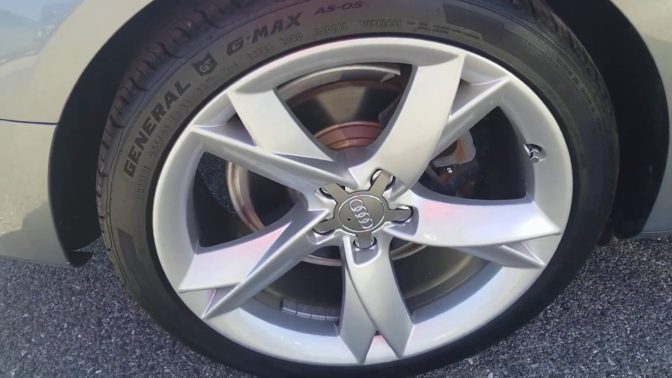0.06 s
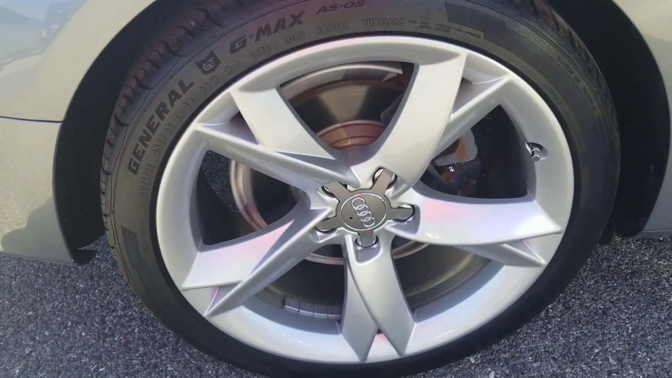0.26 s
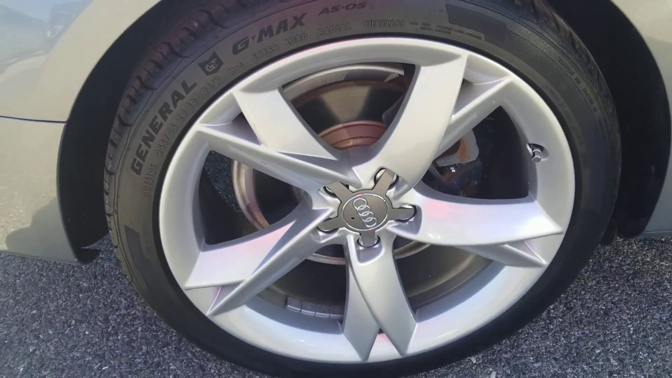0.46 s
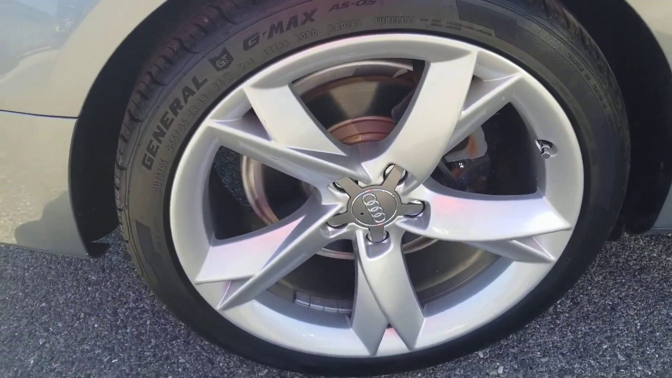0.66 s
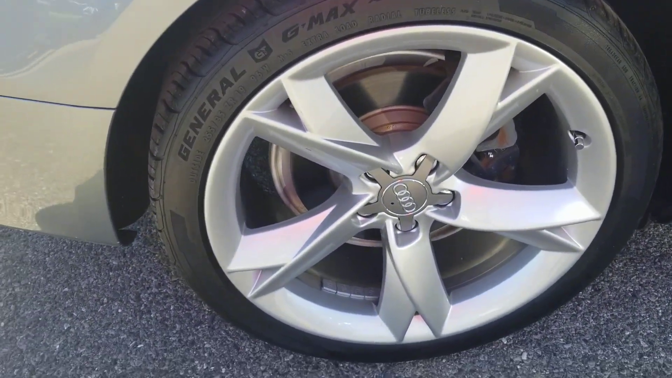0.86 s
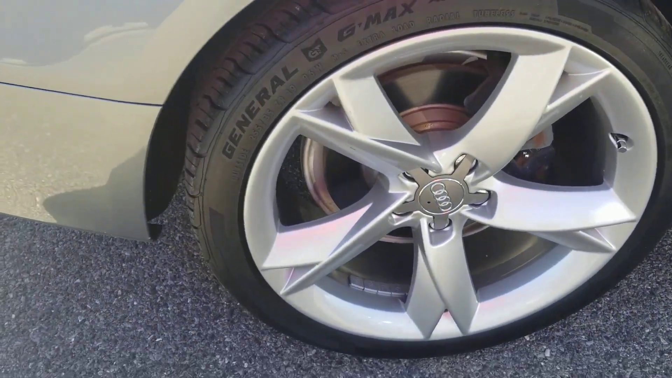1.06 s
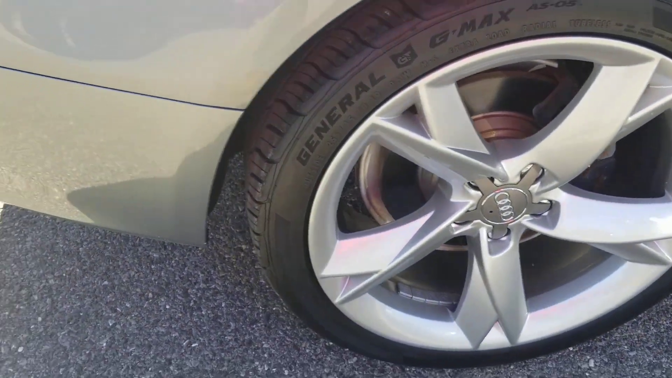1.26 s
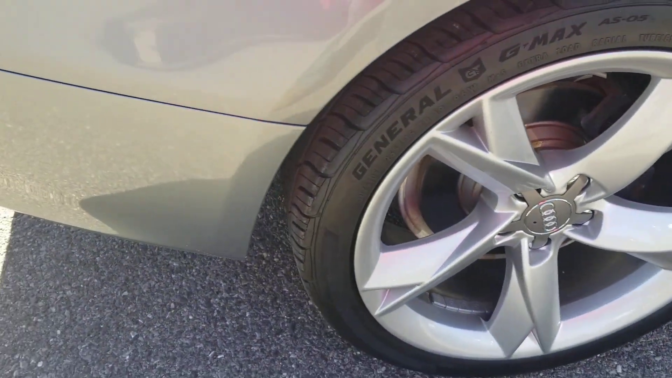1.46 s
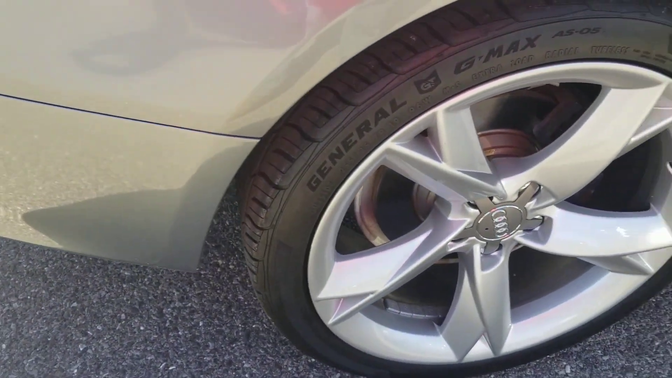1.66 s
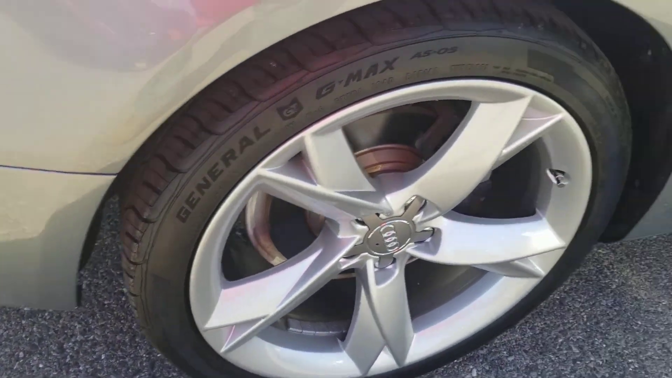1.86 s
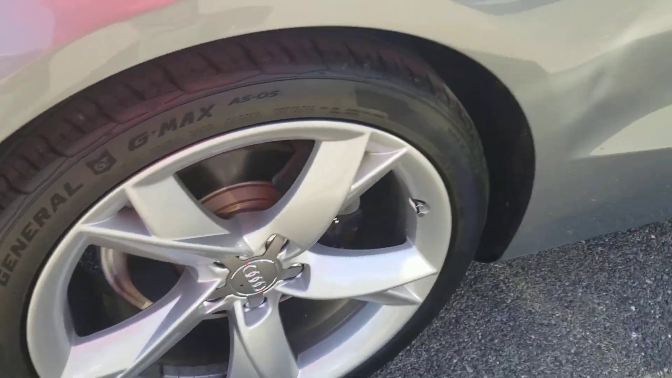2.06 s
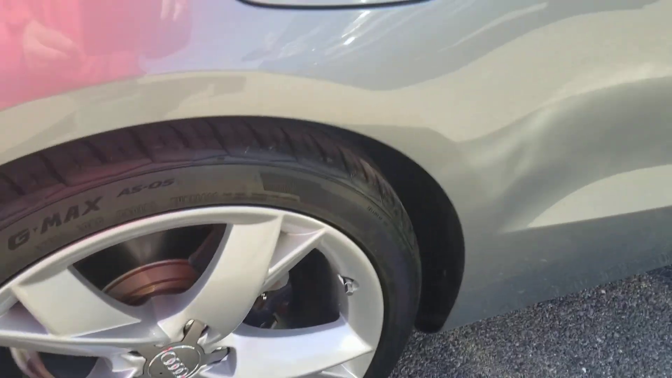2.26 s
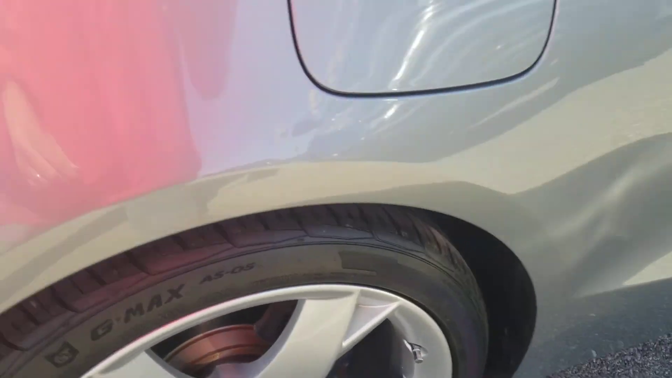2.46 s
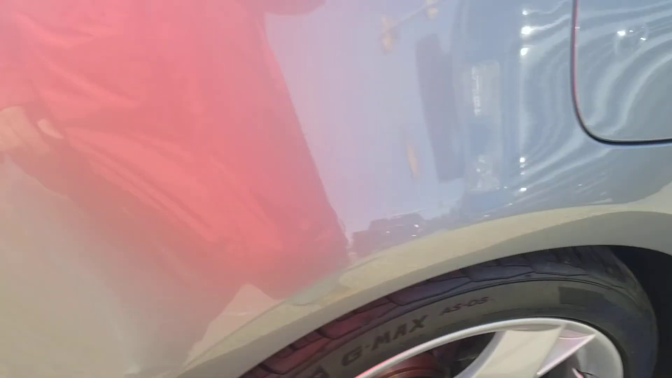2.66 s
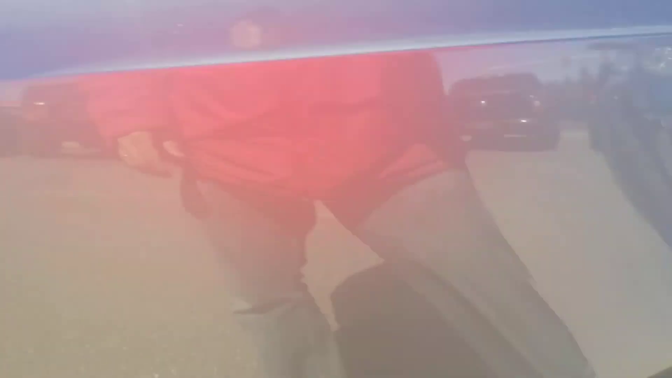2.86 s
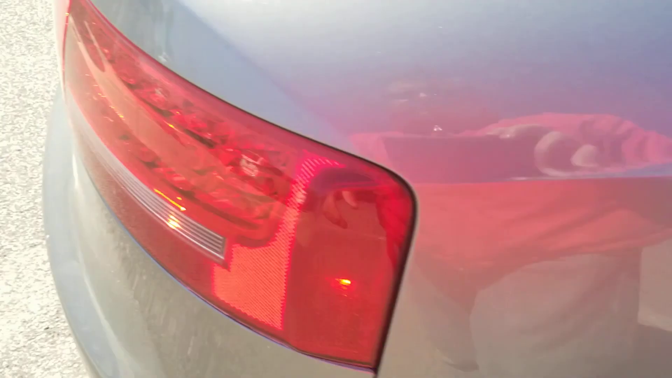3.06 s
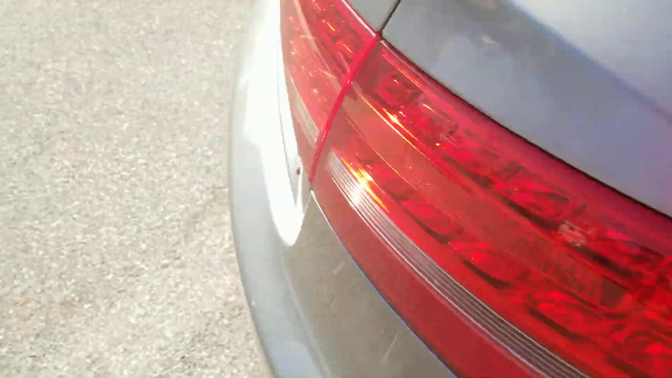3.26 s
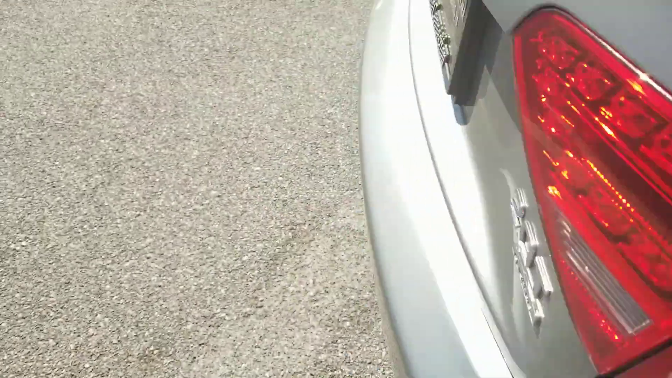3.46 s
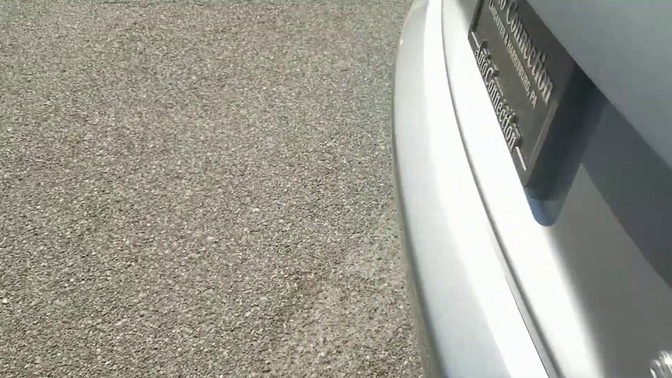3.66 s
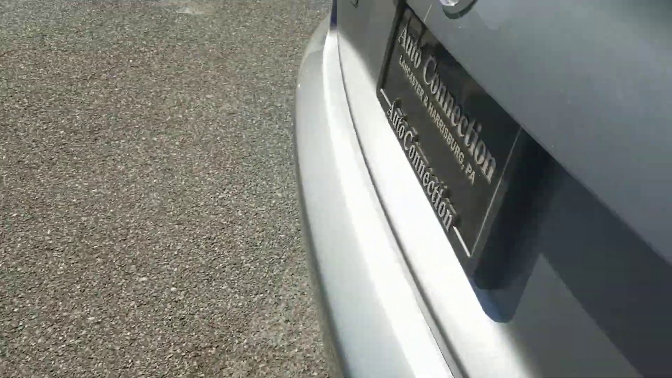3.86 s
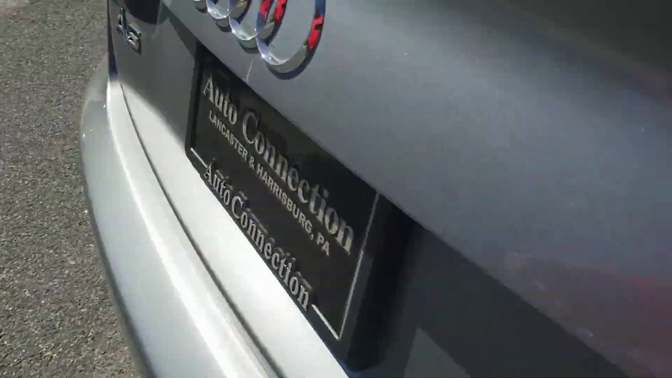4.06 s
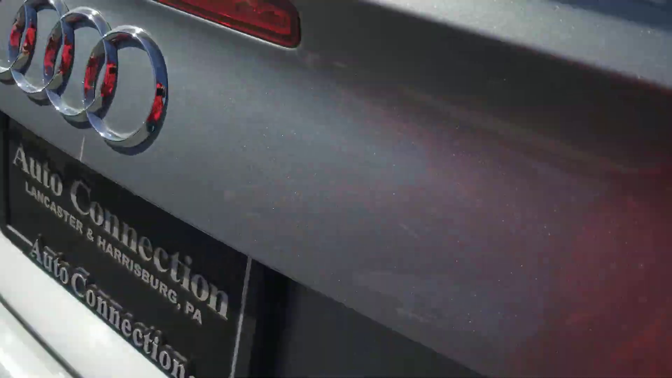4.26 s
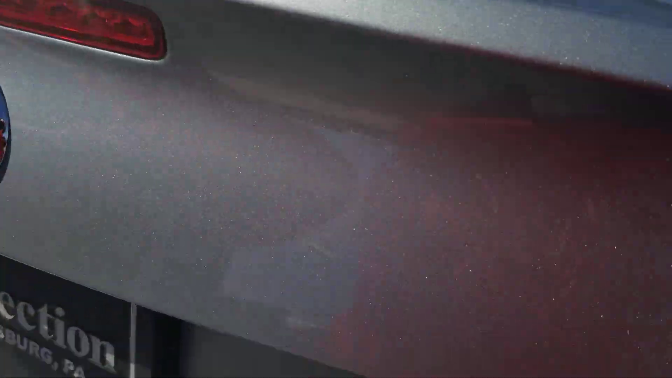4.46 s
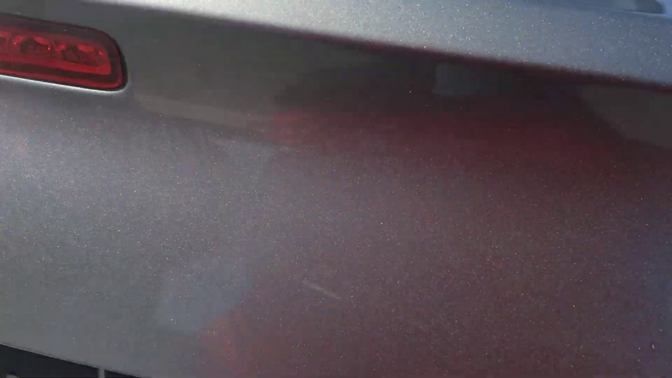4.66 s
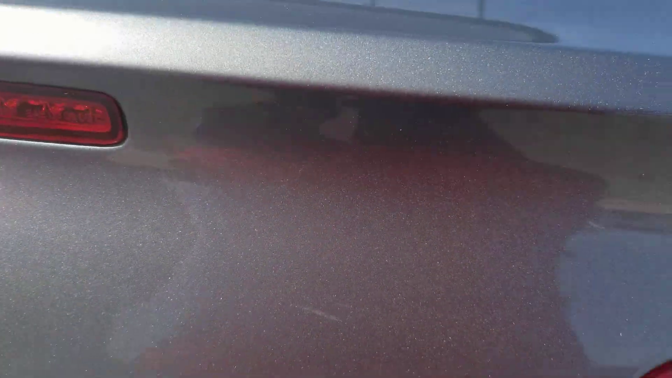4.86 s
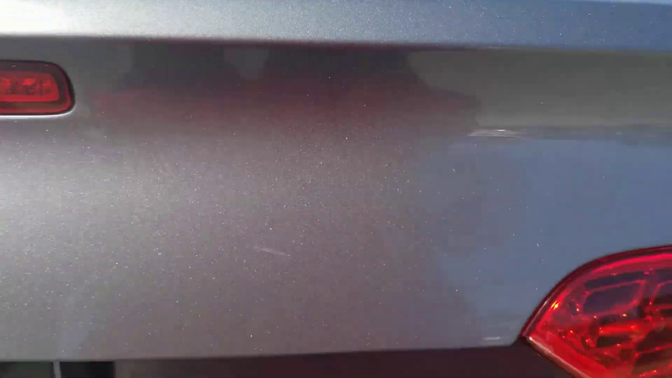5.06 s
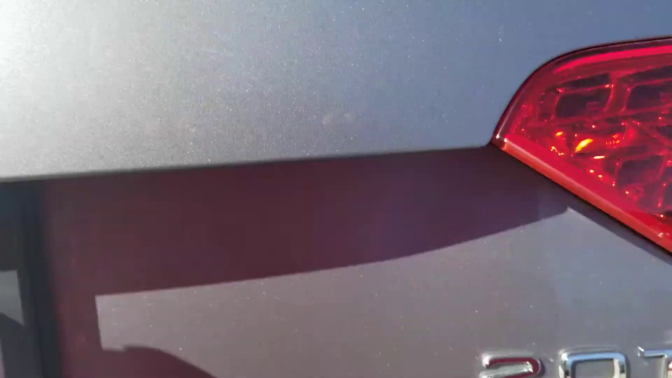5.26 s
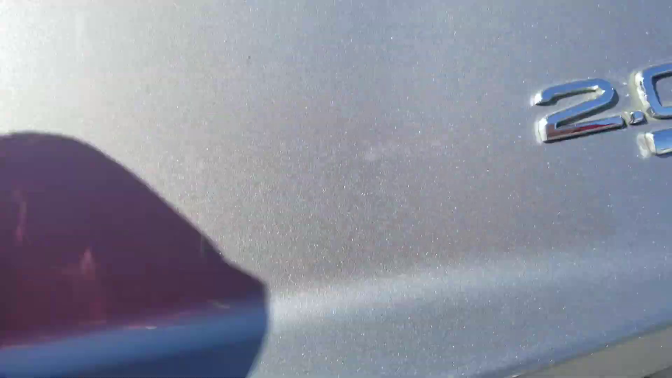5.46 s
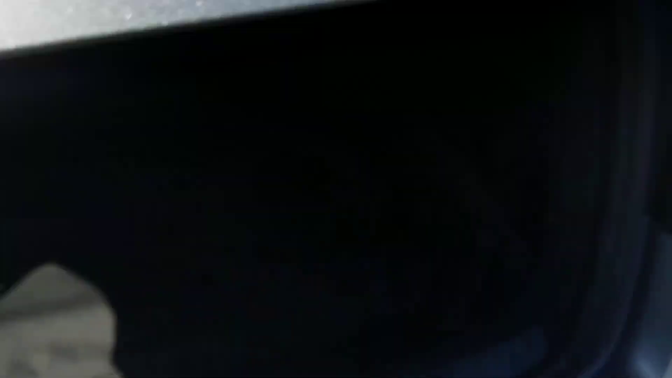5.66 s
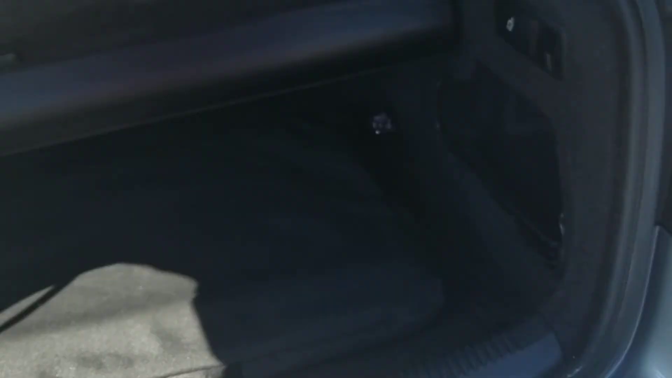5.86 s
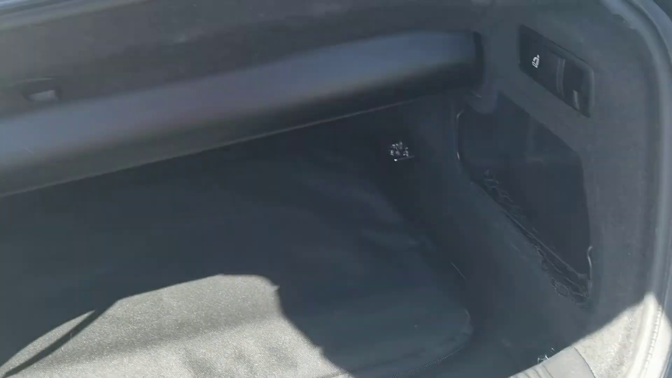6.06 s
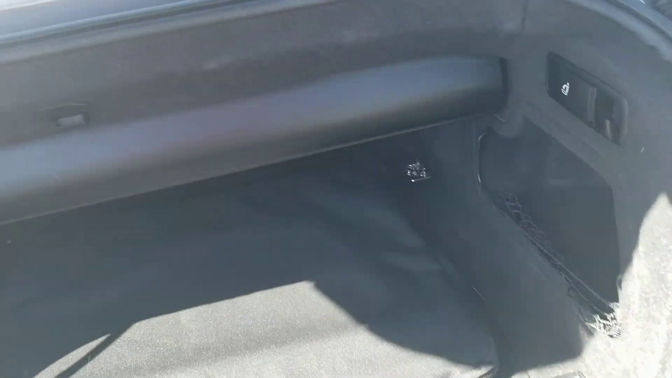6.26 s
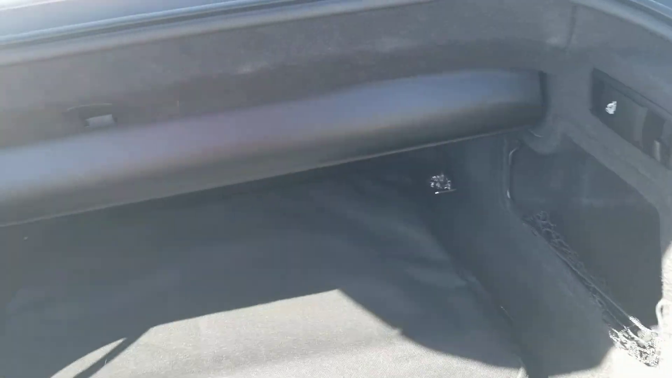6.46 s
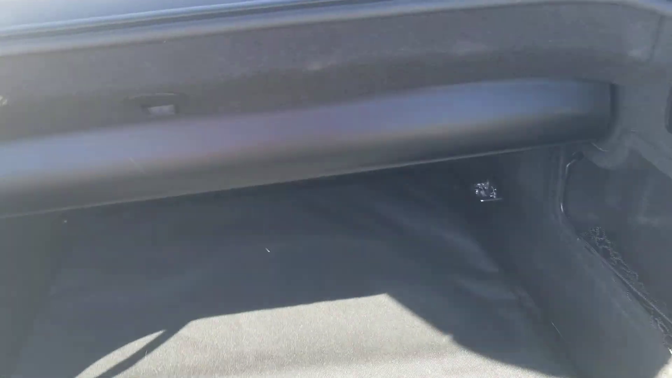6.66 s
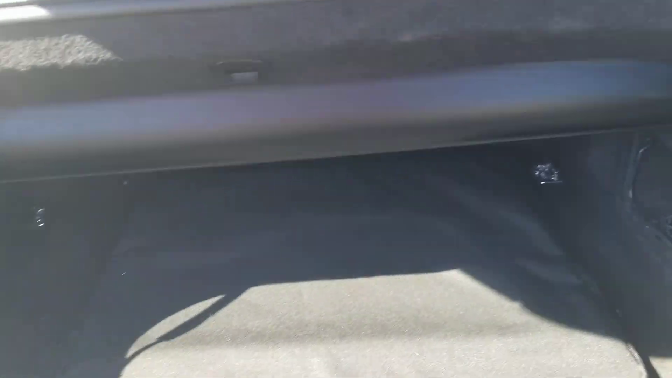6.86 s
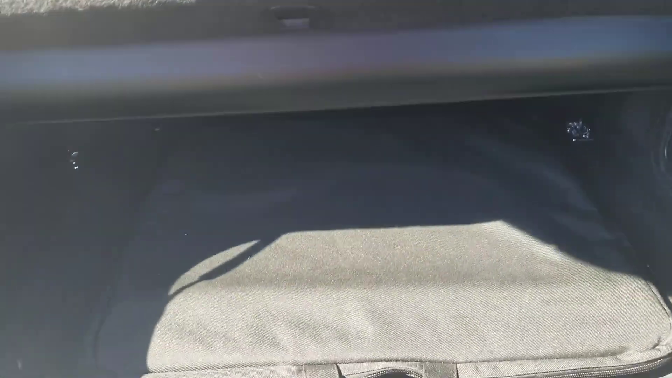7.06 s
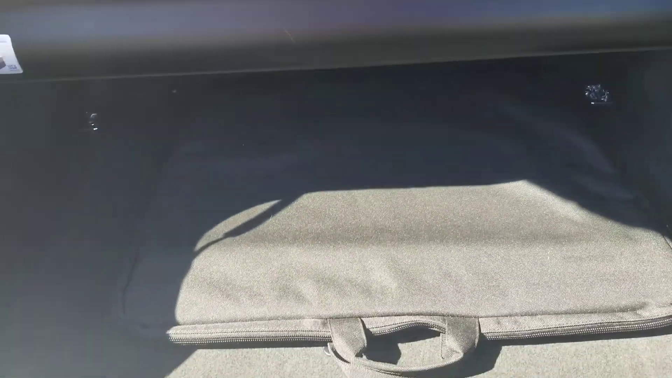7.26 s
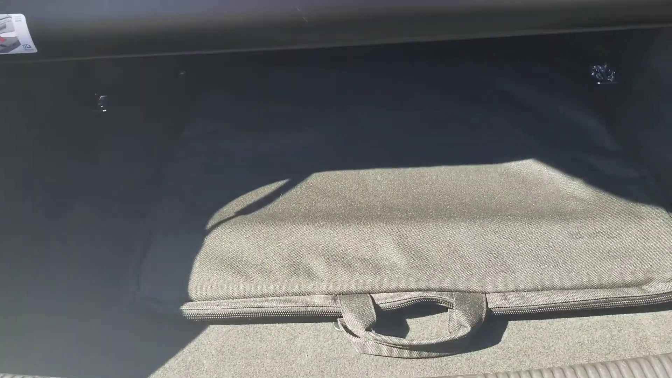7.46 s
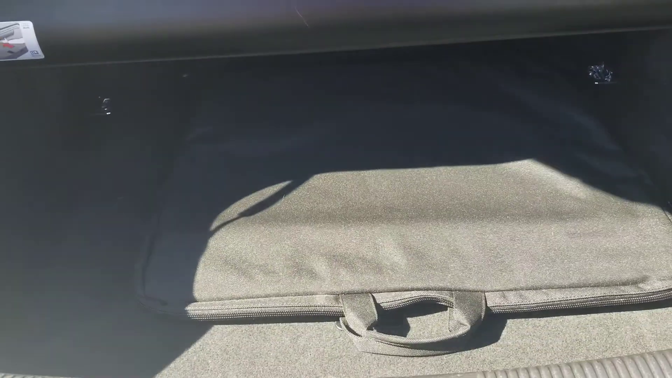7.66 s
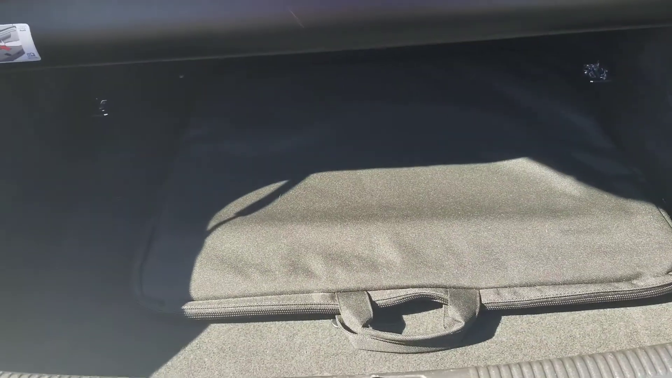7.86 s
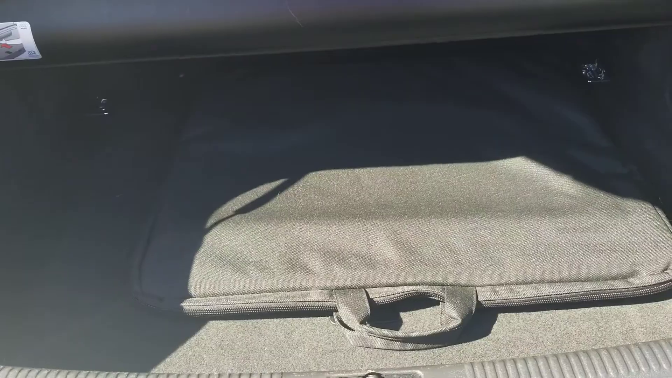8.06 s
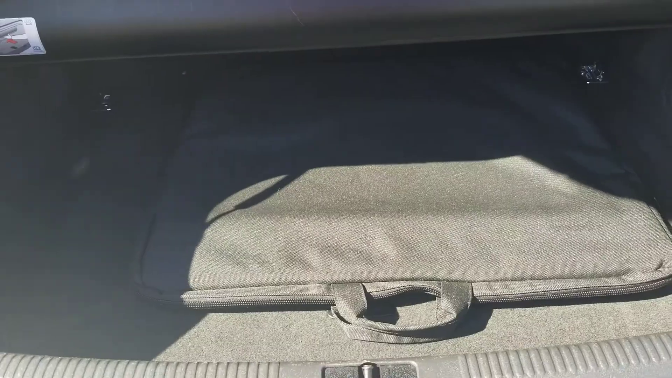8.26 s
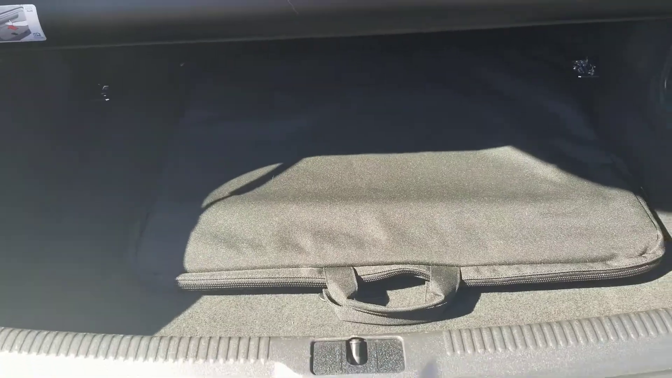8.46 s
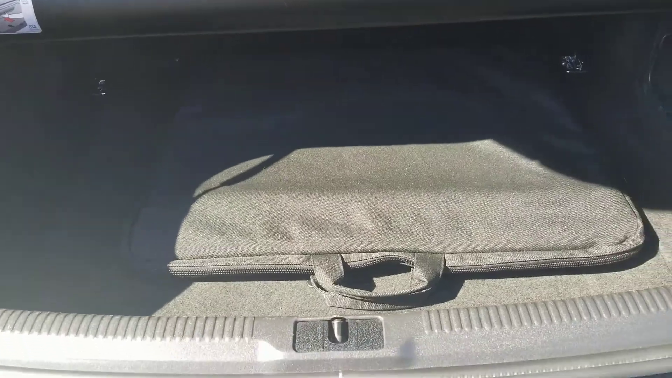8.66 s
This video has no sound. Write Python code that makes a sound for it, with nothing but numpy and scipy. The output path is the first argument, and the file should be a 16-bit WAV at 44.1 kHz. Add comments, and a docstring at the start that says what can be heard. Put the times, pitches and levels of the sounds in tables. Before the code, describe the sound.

A car trunk latch whirs and clacks open sharply, then clicks again, over low traffic rumble and an idling engine on an open lot.

```python
"""Traffic rumble, the drones of passing engines and tyre roar lie to the right, under a car idling on an open lot.
The microphone is carried from the rear wheel to the trunk: exhaust orders, chuff and hiss follow level curves.
The latch motor whirs, the pawl snaps free, the lid pops off its rubber seal and rises; small trim ticks follow.
Noise beds are filtered, engines are sines, and latch and trim are rattling contacts that ring damped modes."""
import sys
import numpy as np
from scipy import signal
from scipy.fft import rfft, irfft, next_fast_len
from scipy.io import wavfile

SR = 44100
rng = np.random.default_rng(int(sys.argv[2]) if len(sys.argv) > 2 else 0)


def volts_from_db(level):
    """Convert decibel levels to linear amplitude ratios."""
    exponent = np.asarray(level, float) / 20
    return 10 ** exponent


def transcribe(u):
    """Save the signal u as a 16-bit wav file named by the first command-line argument.

    u: samples, shape (n,) or (channels, n), limited to [-1, 1]; the rate is SR.
    q: integer samples, one column per channel.
    """
    v = np.clip(np.atleast_2d(u).T, -1, 1)
    q = np.round(v * 32767).astype(np.int16)
    wavfile.write(sys.argv[1], SR, q)


N = 384664   # samples, 8.72 s
HZ = np.fft.rfftfreq(next_fast_len(N), 1 / SR) + 1e-3   # just above zero, so its logarithm exists

# Left-right likeness of far noise: hz, likeness (0 to 1)
LIKENESS = [(30, 0.74), (100, 0.78), (300, 0.99), (1000, 0.63), (3000, 0.11), (7000, 0.019), (15000, .02)]
# Levels around the turning microphone: time_s, chuff_db, tyre_roar_db, engine_bay_hiss_db, high_hiss_db
AROUND_LEVELS = [(0.0, -50.5, -52, -59, -60), (0.87, -49.5, -51, -59.5, -60), (1.8, -54, -51, -60.5, -61.5),
                 (2.31, -50.5, -49.5, -57.5, -59), (2.62, -49.5, -50.5, -60.5, -59),
                 (3.1, -48.5, -53.5, -66, -64.5), (3.42, -47.5, -51.5, -65, -62),
                 (3.7, -48, -55.5, -66.5, -66.5), (4.25, -49, -50.5, -62.5, -60),
                 (4.69, -46, -52, -61.5, -60), (4.9, -45.5, -53.5, -67, -64),
                 (5.39, -51, -55.5, -68, -65.5), (5.8, -51.5, -56, -65.5, -59.5),
                 (6.29, -51, -50.5, -64.5, -62), (6.7, -52.5, -52, -67.5, -65),
                 (7.3, -52.5, -52.5, -66, -68), (8.09, -51, -52.5, -66.5, -69),
                 (8.72, -49.5, -50.5, -65.5, -66)]
# Traffic rumble swelling and sinking: time_s, level_db
RUMBLE_LEVEL = [(0.0, -38), (.31, -34), (.44, -40), (1.4, -33.5), (1.63, -32), (1.73, -46), (1.87, -29.5),
                (2.08, -35.5), (2.2, -31.5), (3.42, -31), (3.62, -41), (3.9, -33.5), (4.25, -38),
                (4.7, -34), (5.8, -35.5), (5.94, -36), (6.04, -45), (6.17, -29.5), (6.22, -36),
                (6.35, -39.5), (6.7, -41.5), (7.0, -38.5), (7.3, -35.5), (8.1, -37.5), (8.72, -36)]
# Noise colours, only their shape counts: hz, density_db (per Hz)
RUMBLE_COLOUR = [(12, -34), (20, -14.5), (91, -3), (400, -28), (520, -47), (880, -120)]
TYRE_ROAR_COLOUR = [(530, -5.5), (900, 0), (1260, -2.5), (1480, 0.5), (2230, -6.5), (3400, -21),
                    (4420, -25.5), (7480, -120)]
SWISH_COLOUR = [(1000, -28), (1400, -3.5), (1900, 1), (2400, -2.5), (3000, -11), (4000, -20.5)]
ENGINE_BAY_COLOUR = [(1710, -20), (2900, 3.5), (3960, 1), (4460, 4), (5620, 3), (6520, -0.5), (7600, -14),
                     (9880, -56), (16700, -120)]
HIGH_HISS_COLOUR = [(4000, -67), (6800, -6), (8020, -4), (12500, 2.5), (15200, -3.5), (15750, 3)]
CHUFF_COLOUR = [(150, -68), (260, -9.5), (340, -15), (420, -15), (900, -19), (1050, -20.5), (1360, -23),
                (2310, -120)]
TAILPIPE_COLOUR = [(370, -28), (448, -10.5), (485, -9.5), (503, -1.5), (523, -12), (560, -10.5), (682, -9),
                   (770, -14), (900, -40)]
RUB_COLOUR = [(180, -41), (300, -8), (600, -1), (959, 0), (1370, -2.5), (1650, -4), (2000, 1.5), (2760, -4),
              (3600, -5.5), (4700, -14), (6100, -29), (7540, -51), (15000, -34)]
# Tyre swish of cars going by: nearest_s, peak_db, approach_db_per_s, retreat_db_per_s
PASSING_CARS = [(4.55, -54.5, 5, 18), (6.4, -51, 12, 10)]
# Exhaust notes of passing engines, one table each: time_s, pitch_hz, level_db
DRONES = [
    [(0.0, 91.6, -34), (.3, 88.8, -38.5), (.45, 87.2, -46), (.55, 85.7, -31), (1.15, 80.8, -32),
     (1.4, 78, -34), (1.7, 75.5, -39)],
    [(1.8, 72, -30), (2.05, 66.1, -43), (2.2, 63.6, -28), (2.6, 60.5, -44), (2.85, 59.74, -28.5),
     (3.1, 59.2, -28.5), (3.7, 55.56, -39)],
    [(1.8, 103, -46), (1.9, 99.8, -43), (2.08, 96.6, -57), (2.5, 93.7, -37), (3.35, 89.24, -33),
     (3.6, 87.5, -61)],
]
# Short low booms from the road: peak_s, length_s, pitch_hz, level_db
BOOMS = [(.1, 0.36, 66, -34.5), (0.734, 0.63, 65, -28.5), (1.318, 0.27, 66, -25.5),
         (2.518, 0.27, 72, -26.5), (7.419, 0.47, 74.5, -31.5)]
# Low pressure bumps: gusts and grip at the microphone, and the lid's thump near 4.97 s:
# time_s, peak_db, length_s, left_over_right_db
BUMPS = [(4.422, -20, 0.019, 1), (4.972, -23, 0.017, 0), (5.789, -24, 0.016, -7), (5.979, -26.5, 0.0084, 3),
         (6.174, -23, 0.0061, 1), (6.544, -26.5, 0.0058, -7), (6.61, -27, .01, 14)]
# The exhaust comes nearer, then the trunk screens it: time_s, first_order_db, orders_2_to_4_db, upper_orders_db
IDLE_LEVELS = [(0, -38, -30, -35.5), (.6, -38, -49, -37.5), (1.6, -38, -56, -39), (2.4, -49, -57, -44),
               (3.1, -34, -44, -39), (3.7, -30.5, -36, -35), (4.6, -38, -32, -36.5), (5.0, -42, -39.5, -37),
               (5.5, -34, -38, -40), (6.1, -42, -51, -47), (6.9, -42, -42, -47), (7.7, -35, -43.5, -43),
               (8.72, -36, -41.5, -40.5)]
# Balance of the exhaust orders, added to the levels above: multiple of the firing rate, level_db
IDLE_ORDERS = [(1, -7), (2, 1.5), (3, -2.5), (4, -11.5), (5, -6.5), (6, -13.5), (7, -11), (8, -19.5),
               (9, -13.5), (11, -20.5), (12, -30.5), (13, -23.5)]
# The tailpipe's roar swells as the bumper comes near: time_s, level_db
TAILPIPE_LEVEL = [(0.0, -55), (0.31, -54), (0.8, -52), (1.02, -55.5), (1.92, -54.5), (2.6, -55.5),
                  (2.85, -49), (3.5, -49.5), (3.96, -48), (4.6, -49), (5.1, -51), (5.41, -52.5),
                  (6.41, -51), (6.85, -54.5), (7.29, -49.5), (8.06, -53), (8.72, -54.5)]
# Small metal parts of latch and hinge tink very high: time_s, peak_db, pitch_hz, t60_s
TINKS = [(4.8125, -20.5, 8540, .02), (4.967, -43, 6200, .015), (4.972, -30, 12280, 0.013),
         (5.1643, -26, 13840, .015), (5.1645, -34, 14800, .015), (5.165, -33.5, 5200, 0.0096),
         (5.165, -42, 7030, .006), (5.18, -38, 13400, .015), (6.4917, -44, 11300, .012)]
# Dull ticks of trim and handling: time_s, mode_peak_db, pitch_hz, left_over_right_db, crack_db, rattle_s
TICKS = [(0.2783, -44, 2500, -2.0, -50, 0.0022), (2.3411, -40, 1720, -2.5, -46, 0.003),
         (6.0752, -32, 1530, 0, -57, 0.0019), (6.1771, -33, 1630, -2, -55, 0.0034),
         (6.275, -43, 2340, -9, -44, 0.0033), (6.492, -29.5, 1230, 7, -44, 0.0029),
         (6.496, -28, 1470, 1, -46, 0.0049), (7.5386, -42, 1220, -2.0, -59, 0.0022),
         (7.775, -40.5, 1710, -6, -66, 0.0022), (7.845, -32, 1640, -7, -55, 0.0017),
         (7.972, -40, 1630, -5, -55, 0.0023), (8.2444, -39, 1230, -2, -60, .004),
         (8.2814, -41, 1280, -5, -63, 0.0035), (8.3137, -37, 1140, -7, -53, .003)]
# Modes of one tick: multiple of the tick's pitch, share
TICK_MODES = [(.82, 0.15), (1, 1), (1.33, 0.5)]
# Latch motor, pawl scraping free, seal letting go, a scuff; the last row starts after the end and stays silent:
# start_s, loudest_s, stop_s, loudest_db, lowpass_at_loudest_hz
RUBS = [(4.743, 4.768, 4.803, -27.5, 11000), (4.803, 4.818, 4.835, -35, 3700),
        (5.152, 5.168, 5.258, -36.5, 4300), (2.14, 2.18, 2.215, -46.5, 11000), (9.4, 8.25, 9.9, -59, 3000)]
# Damped modes of the lid body: pitch_hz, level_db, t60_s
LID_MODES = [(217, -10, .05), (310, -23, 0.042), (483, 1, 0.049), (702, -2, 0.062), (866, 3, 0.019),
             (1050, -1.5, 0.028), (1150, -3.5, 0.027), (1390, 1, 0.044), (1900, 3, 0.021),
             (2057, -3.5, 0.047), (2230, -1, 0.018), (2710, -7, 0.042), (3504, 1, 0.028),
             (5400, -21, 0.026), (5920, -10, 0.026)]
# Blows in latch and lid: time_s, mode_peak_db, crack_db, sizzle_db, rattle_s, favoured_hz
BLOWS = [(4.7558, -28, -58, -62, .003, 1900), (4.7613, -29, -42, -60, .003, 1200),
         (4.7665, -23, -46, -60, 0.0035, 2700), (4.777, -24, -48, -58, 0.0028, 1950),
         (4.785, -19, -28, -35, 0.0044, 1000), (4.798, -21, -50, -55, .003, 2100),
         (4.804, -11.5, -27, -27, 0.0053, 480), (4.807, -19, -20, -23, .003, 1400),
         (4.8091, -8, -18, -14, 0.0022, 850), (4.8115, -16, -20.5, -16, 0.0028, 500),
         (4.8152, -10, -25, -18, 0.0022, 1900), (4.8172, -10.5, -22, -23, 0.0025, 2050),
         (4.8224, -24, -36, -38, 0.0033, 1300), (4.839, -31, -55, -55, 0.0027, 900),
         (4.8713, -32, -50, -41, .004, 1500), (4.9647, -31, -33.5, -34, 0.0067, 2400),
         (4.9683, -32, -38, -46, .004, 1990), (4.973, -24.5, -45, -44, .005, 1340),
         (4.982, -37, -56, -55, .004, 1400), (4.9865, -38, -61, -60, .004, 1200),
         (5.043, -42, -49, -62, .003, 2700), (5.149, -32, -60, -60, .004, 1150),
         (5.16, -36, -58, -60, .003, 2700), (5.1643, -21, -30, -29, .002, 1150),
         (5.168, -32, -40, -40, .003, 1100), (5.1735, -27, -45, -44, 0.0033, 1300),
         (5.179, -28, -45, -40, .002, 1100), (5.188, -28, -50, -43, .002, 2600),
         (5.2, -31, -44, -39, .003, 1500), (5.201, -26, -52, -50, .002, 2300),
         (5.209, -32, -52, -50, .002, 2000), (5.225, -31, -58, -60, .002, 1300),
         (5.237, -34, -56, -60, 0.0018, 2600), (5.244, -29, -58, -60, .002, 2000),
         (5.2545, -35, -56, -60, 0.0016, 1900), (5.2703, -35, -61, -65, .003, 1800),
         (5.285, -45, -64, -65, .003, 1900)]
# Filters for the dry crack and high sizzle of a blow: hz, gain_db
CRACK_FILTER = [(2000, -15), (3000, 9.5), (4500, -0.5), (6000, 10.5), (7400, -8.5), (8500, -4),
                (10000, -30), (12000, -30)]
SIZZLE_FILTER = [(7000, -3), (9500, -2), (11000, -0.5), (13000, -5), (15000, -1), (16500, -29)]

# Left ear later by, in seconds; negative means earlier
ROAD_SIDE_LAG_S, TINK_LAG_S = 0.00036, -0.00037
LID_PANEL_LAG_S, LATCH_END_LAG_S = -0.00015, -0.00042
EARS = np.array([[1], [-1]])   # left, right

FIRINGS_PER_S = 28.4   # average; the idle wanders slightly around it
STRIKE = 0.78   # firm first contact over the rattle after it
BLOW_FOCUS_DB_PER_OCT = 6   # modes away from a blow's favoured pitch ring less
RUB_START_DB, RUB_SAG_DB_PER_S, RUB_STOP_DB_PER_S = -21, 32, 506
RUB_BRIGHTENS_OCT_PER_DB = 0.03   # the lowpass opens as a rub weakens
SLIPS_PER_S = 4000


def in_time(rows):
    """Join each column by straight lines, sample by sample."""
    time_s, *columns = np.transpose(rows)
    return [np.interp(np.arange(N) / SR, time_s, column) for column in columns]


def sounding(rows, fade_s):
    """Gate a table's time span with fades; a table that starts at zero is already sounding."""
    t = np.arange(N) / SR
    inside = np.minimum(t - rows[0][0], rows[-1][0] - t) / fade_s
    already_on = (rows[0][0] < .01) * (t < .5)
    return np.clip(inside + already_on, 0, 1)


def at_hz(points, outside=None):
    """Read a spectrum on the FFT grid, straight over log frequency."""
    hz, value = np.transpose(points)
    return np.interp(np.log(HZ), np.log(hz), value, outside, outside)


def shaped(x, response):
    """Filter by a response on the FFT grid."""
    size = next_fast_len(N)
    return irfft(rfft(x, size) * response, size)[..., :N]


def rms_one(x):
    """Scale to rms 1."""
    return x / np.sqrt(np.mean(x ** 2) + 1e-20)


def peak_one(x):
    """Scale to peak 1, ear by ear."""
    return x / np.max(np.abs(x), axis=-1, keepdims=True)


def drift(rate_hz):
    """Slow random wander of rms 1: noise through two equal poles, made at a fortieth of the sample rate."""
    pole = np.exp(-2 * np.pi * rate_hz * 40 / SR)
    noise = rng.standard_normal(N // 40 + 2002)
    slow = signal.lfilter([1], [1, -2 * pole, pole * pole], noise)[2000:]   # let the filter settle
    return np.interp(np.arange(N) / 40, np.arange(len(slow)), rms_one(slow))


def placed(x, lag_s, pan_db):
    """Place a sound between two microphone ports: the left hears it later by lag_s and louder by pan_db."""
    pair = np.broadcast_to(x, (2, N)) * volts_from_db(EARS * pan_db / 2)
    return shaped(pair, np.exp(-1j * np.pi * HZ * lag_s * EARS))


def bed(colour_points, level_db, flicker_db, pan_db):
    """Far noise from the road side, much alike in both ears in the bass and nearly separate in the treble."""
    alike = np.clip(at_hz(LIKENESS), 0, 1)
    colour = volts_from_db(at_hz(colour_points, outside=-150))
    mid, side = rng.standard_normal((2, N))
    mid = shaped(mid, colour * np.sqrt(1 + alike))
    side = shaped(side, colour * np.sqrt(1 - alike))
    pair = rms_one(mid + side * EARS) * volts_from_db(level_db + flicker_db * drift(23.7))
    return placed(pair, ROAD_SIDE_LAG_S, pan_db)


def ring(x, hz, t60_s):
    """Damped resonator: a unit click sets a sine of height 1 ringing."""
    pole, w = volts_from_db(-60 / (t60_s * SR)), 2 * np.pi * hz / SR
    return signal.lfilter([0, np.sin(w)], [1, -2 * pole * np.cos(w), pole * pole], x + 1e-18)


def contact_samples(length_s):
    """Decay constant of a contact in samples, kept within 0.3 to 20 ms."""
    return np.clip(length_s, 3e-4, .02) * SR


def rattle(length_s, apart):
    """A short grainy decaying contact, its energy set by its length; each ear gets partly its own."""
    n, length = int(.1 * SR), contact_samples(length_s)
    grains = rng.standard_normal((3, n)) * volts_from_db(8.2 * rng.standard_normal(n))
    hit = (grains[0] + apart * grains[1:]) * np.exp(-np.arange(n) / length)
    return hit / np.sqrt(np.sum(hit ** 2) / length)


def struck(length_s, apart):
    """One firm first contact on top of its rattle."""
    hit = rattle(length_s, apart)
    hit[:, 0] += STRIKE * np.sqrt(contact_samples(length_s))
    return hit


def surroundings():
    """Filtered noise for traffic rumble, tyre roar, tyre swish, engine-bay hiss and high hiss."""
    t = np.arange(N) / SR
    _, roar_db, bay_db, high_db = in_time(AROUND_LEVELS)
    rumble_db = in_time(RUMBLE_LEVEL)[0] + 1.5 * drift(3.6)
    cars_db = [peak_db - np.maximum(approach * (nearest_s - t), retreat * (t - nearest_s))
               for nearest_s, peak_db, approach, retreat in PASSING_CARS]
    swish_db = np.max(cars_db, axis=0)   # the louder car wins
    road = bed(RUMBLE_COLOUR, rumble_db, 1.85, 0.2) + bed(TYRE_ROAR_COLOUR, roar_db, 1.55, -2.2)
    road = road + bed(SWISH_COLOUR, swish_db, 2.66, -2.5)
    return road + bed(ENGINE_BAY_COLOUR, bay_db, 1.0, -3.5) + bed(HIGH_HISS_COLOUR, high_db, 0.88, -0.15)


def drones():
    """Exhaust notes of passing cars sag in pitch as they go by; booms swell and die on one pitch."""
    out, t = 0, np.arange(N) / SR
    for rows in DRONES:
        hz, level_db = in_time(rows)
        phase = 2 * np.pi * np.cumsum(hz) / SR + rng.uniform(0, 2 * np.pi)
        out = out + np.sqrt(2) * sounding(rows, 0.061) * volts_from_db(level_db) * np.sin(phase)
    for peak_s, length_s, hz, level_db in BOOMS:
        swell = np.cos(np.pi * np.clip((t - peak_s) / length_s, -.5, .5)) ** 2
        tone = np.sin(2 * np.pi * hz * t + rng.uniform(0, 2 * np.pi))
        out = out + np.sqrt(2) * volts_from_db(level_db) * swell * tone
    return placed(out, ROAD_SIDE_LAG_S, 0.65)


def bumps():
    """Each bump is one short drop in pressure with a small rebound on both sides."""
    out, t = 0, np.arange(N) / SR
    for time_s, peak_db, length_s, pan_db in BUMPS:
        u = 4 * (t - time_s) / length_s
        out = out - volts_from_db(peak_db + EARS * pan_db / 2) * (1 - u ** 2) * np.exp(-u ** 2 / 2)
    return out


def idle():
    """Exhaust orders roughly in step make one push per firing; uneven burning makes each order waver."""
    first_db, low_db, upper_db = in_time(IDLE_LEVELS)
    firing_hz = FIRINGS_PER_S * (1 + 0.002033 * drift(0.505))
    firing_phase = 2 * np.pi * np.cumsum(firing_hz) / SR
    tones = 0
    for order, order_db in IDLE_ORDERS:
        group_db = first_db if order == 1 else low_db if order <= 4 else upper_db
        waver_db = (1.5 + 0.13 * order) * drift(3.9 + 0.33 * order)   # higher orders waver more and faster
        phase = rng.normal(0, 1.0) + rng.normal(0, 0.064) * EARS   # reflections differ by ear
        wave = np.cos(order * firing_phase + phase)
        tones = tones + np.sqrt(2) * volts_from_db(order_db + group_db + waver_db) * wave
    chuff = bed(CHUFF_COLOUR, in_time(AROUND_LEVELS)[0], 1.45, -.5)
    chuff = chuff + bed(TAILPIPE_COLOUR, in_time(TAILPIPE_LEVEL)[0], 2.0, -1.6)
    # the chuff pulses at the firing rate and at twice it
    puffs = 1 + 0.25 * np.cos(2 * firing_phase) + 0.18 * np.cos(firing_phase)
    return placed(tones, ROAD_SIDE_LAG_S, 0.25) + chuff * puffs


def tinks():
    """Single high modes of small metal parts: a few clear ones, and a faint hinge scatter as the lid rises."""
    from_s, to_s, per_s = 5.4, 5.97, 36
    low_hz, high_hz, t60_s = 8570, 15000, 0.014
    quietest_db, spread_db = -57.5, 8
    chance = rng.random((int(per_s * (to_s - from_s)), 3))
    faint = [(from_s + a * (to_s - from_s), quietest_db + spread_db * b, low_hz * (high_hz / low_hz) ** c, t60_s)
             for a, b, c in chance]
    out = np.zeros((2, N))
    for time_s, peak_db, hz, t60_s in TINKS + faint:
        hit, at = rattle(.0015, .5), round(time_s * SR)
        out[:, at:at + hit.shape[1]] += volts_from_db(peak_db) * peak_one(ring(hit, hz, t60_s))
    return placed(out, TINK_LAG_S, .5)


def ticks():
    """Plastic ticks: a damped main mode, two neighbours and a faint crack."""
    out, t60_s = np.zeros((2, N)), 0.016
    crack_band = signal.butter(2, (890, 4250), "band", fs=SR, output="sos")   # Hz
    for time_s, peak_db, hz, pan_db, crack_db, rattle_s in TICKS:
        hit, at = struck(rattle_s, .3), round(time_s * SR)
        modes = sum(share * peak_one(ring(hit, ratio * hz, t60_s)) for ratio, share in TICK_MODES)
        tick = volts_from_db(peak_db) * peak_one(modes) + volts_from_db(crack_db) * signal.sosfilt(crack_band, hit)
        out[:, at:at + hit.shape[1]] += volts_from_db(EARS * pan_db / 2) * tick
    return out


def scrape():
    """Dense random slips of uneven size, coloured by the rub and ringing the lid's modes."""
    sizes = volts_from_db(4.5 * np.minimum(rng.exponential(1, (2, N)), 5)) * rng.choice([-1, 1], (2, N))
    shared, uneven = sizes * (rng.random((2, N)) < SLIPS_PER_S / SR)
    slips = shared + uneven * np.array([[2.1], [0.43]])   # the second stream is stronger in the left ear
    slips = rms_one(shaped(slips, volts_from_db(at_hz(RUB_COLOUR, outside=-150))))
    ringing = sum(volts_from_db(level_db) * ring(slips, hz, t60_s) for hz, level_db, t60_s in LID_MODES)
    return slips + volts_from_db(-3) * rms_one(ringing)


def rubbing():
    """A rub builds up, sags and stops, catching unevenly; the weaker it is the brighter its scrape."""
    t, slips = np.arange(N) / SR, scrape()
    corners_hz = np.array([1500, 3000, 6000, 12000])
    dulled = [rms_one(shaped(slips, 1 / (1 + (HZ / corner) ** 6))) for corner in corners_hz]
    out, catch_db = 0, 2.5 * drift(79)
    for start_s, top_s, stop_s, top_db, corner_hz in RUBS:
        rising_db = RUB_START_DB * np.clip((top_s - t) / (top_s - start_s), 0, 1)
        sag_db = RUB_SAG_DB_PER_S * np.maximum(t - top_s, 0)
        stop_db = RUB_STOP_DB_PER_S * np.maximum(t - stop_s, 0)
        below_db = rising_db - sag_db - stop_db
        # crossfade between lowpassed versions one octave apart
        place = np.log2(corner_hz / corners_hz[0]) - RUB_BRIGHTENS_OCT_PER_DB * below_db
        place = np.clip(place, 0, 3)
        mix = sum(np.clip(1 - np.abs(place - k), 0, 1) * x for k, x in enumerate(dulled))
        fade_in = np.clip((t - start_s) / 0.017, 0, 1)
        out = out + fade_in * volts_from_db(top_db + below_db + catch_db) * mix
    return placed(out, LID_PANEL_LAG_S, -10.0)


def latch():
    """Every blow rings the lid's damped modes and adds a dry crack and a high sizzle."""
    panel, edge, crack, sizzle = np.zeros((4, 2, N))
    mode_hz = np.array(LID_MODES)[:, 0]
    low = mode_hz < 1600   # low modes come from the whole panel, high ones from the latch end
    for time_s, peak_db, crack_db, sizzle_db, rattle_s, favoured_hz in BLOWS:
        hit, at = struck(rattle_s, .65), round(time_s * SR)
        octaves_away = np.abs(np.log2(mode_hz / favoured_hz))
        strengths_db = rng.normal(0, 1.5, len(LID_MODES)) - BLOW_FOCUS_DB_PER_OCT * octaves_away
        modes = np.array([volts_from_db(level_db + own_db) * peak_one(ring(hit, hz, t60_s))
                          for (hz, level_db, t60_s), own_db in zip(LID_MODES, strengths_db)])
        modes[::2] *= -1   # neighbouring modes start in opposite directions
        modes = volts_from_db(peak_db) * modes / np.max(np.abs(modes.sum(axis=0)))
        span = slice(at, at + hit.shape[1])
        panel[:, span] += modes[low].sum(axis=0)
        edge[:, span] += modes[~low].sum(axis=0)
        crack[:, span] += volts_from_db(crack_db) * rattle(.7 * rattle_s, .9)
        sizzle[:, span] += volts_from_db(sizzle_db) * rattle(.7 * rattle_s, .9)
    crack = shaped(crack, volts_from_db(at_hz(CRACK_FILTER, -80)))
    sizzle = shaped(sizzle, volts_from_db(at_hz(SIZZLE_FILTER, -80)))
    body = placed(panel, LID_PANEL_LAG_S, -2.5) + placed(edge + crack, LATCH_END_LAG_S, -3.8)
    return body + placed(sizzle, LATCH_END_LAG_S, -.5)


def scene():
    """Traffic, engine and the trunk in the open air."""
    return surroundings() + drones() + bumps() + idle() + tinks() + ticks() + rubbing() + latch()


def band_limit(x):
    """A steep low-pass at the top of the band."""
    return signal.sosfilt(signal.butter(12, 16510, fs=SR, output="sos"), x)


def record(dry):
    """Turn the finished mix into the output sound."""
    return band_limit(dry)


dry = scene()
out = record(dry)
transcribe(out)
```